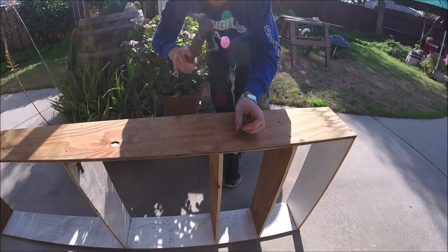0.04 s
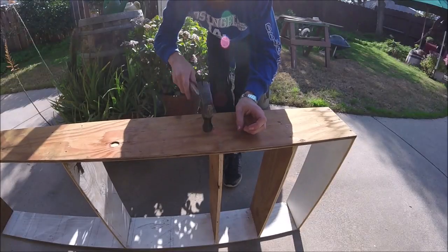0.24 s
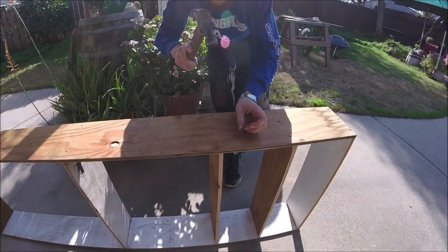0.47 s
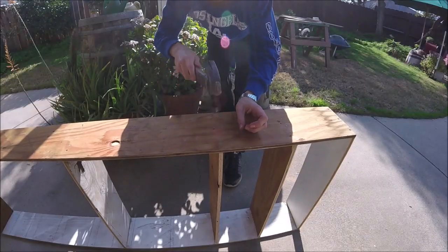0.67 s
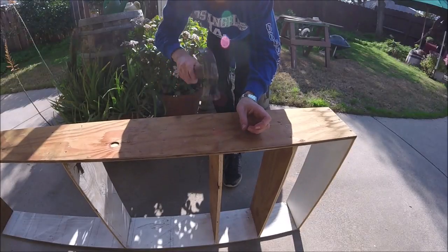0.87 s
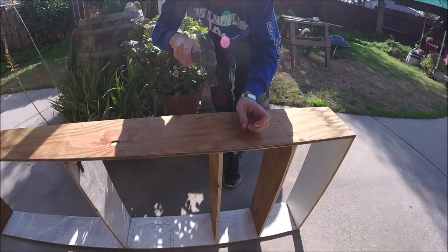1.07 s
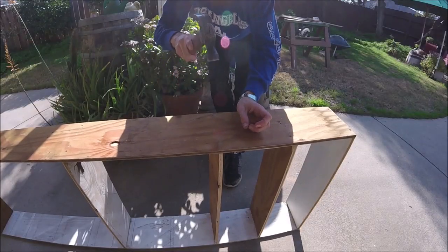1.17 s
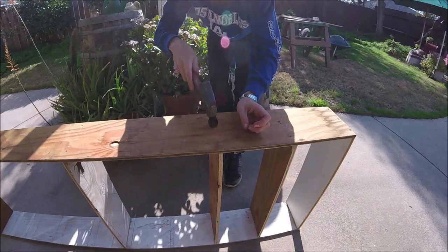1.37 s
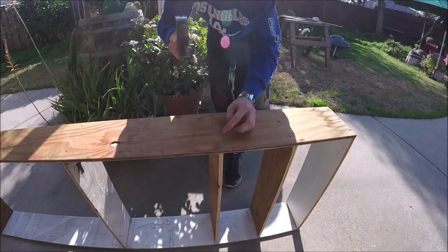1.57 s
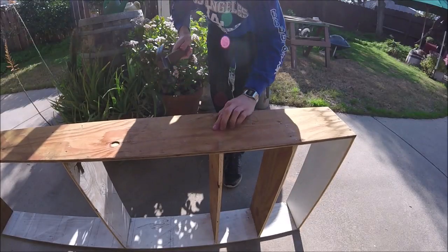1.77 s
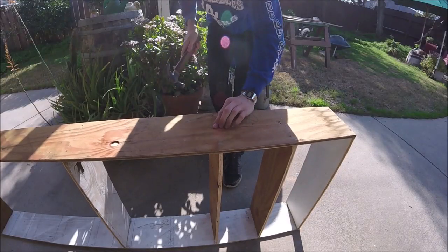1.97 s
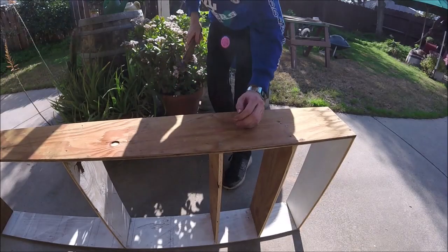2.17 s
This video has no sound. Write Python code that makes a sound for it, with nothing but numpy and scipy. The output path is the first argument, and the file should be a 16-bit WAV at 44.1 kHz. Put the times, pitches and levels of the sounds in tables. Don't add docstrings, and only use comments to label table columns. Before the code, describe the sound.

Close, loud hammering on a hollow wooden frame outdoors: evenly spaced woody cracks with short boom and rattle, early ones bright, the last duller, then only faint wind and distant town rumble remain.

```python
import sys
import numpy as np
from scipy import signal
from scipy.io import wavfile
from scipy.ndimage import uniform_filter1d

SR = 44100
rng = np.random.default_rng(int(sys.argv[2]) if len(sys.argv) > 2 else 0)


def invert_db(level):
    return 10 ** (np.asarray(level, dtype=float) / 20)


def int16_out(signal):
    q = np.round(np.clip(np.atleast_2d(signal).T, -1, 1) * 32767)
    wavfile.write(sys.argv[1], SR, q.astype(np.int16))


N = 98519


def curve(table, hz):
    table = np.array(table)
    return np.interp(np.log(hz), np.log(table[:, 0]), table[:, 1])


def unit(x):
    return x / np.sqrt(np.mean(x ** 2))


def band(hz, width, size):
    edges_hz = [hz / width, min(hz * width, SR * .49)]
    sos = signal.butter(2, edges_hz, "bandpass", fs=SR, output="sos")
    return unit(signal.sosfilt(sos, rng.standard_normal(size + 4096))[4096:])


def fade(t, t60_s):
    return np.exp(-np.log(1000) * t / t60_s)


def swell(t, start_s, rise_s, t60_s):
    t = np.maximum(t - start_s, 0)
    return (1 - np.exp(-t / rise_s)) * fade(t, t60_s)


def walk(rate_hz):
    hold = int(SR / rate_hz)
    steps = np.repeat(rng.standard_normal(N // hold + 1), hold)
    return 1.23 * uniform_filter1d(uniform_filter1d(steps, hold), hold)[:N]


def ping(t, hz, t60_s):
    t = np.maximum(t, 0)
    return fade(t, t60_s) * np.sin(2 * np.pi * hz * t)


def ring(t, modes):
    scatter_db, jitter = 1, .003
    out = 0
    for hz, db, t60_s in modes:
        c = rng.standard_normal(2)
        out = out + invert_db(db + scatter_db * c[0]) * ping(t, hz * (1 + jitter * c[1]), t60_s)
    return out


def hammering():
    # (time [s], level [dB], long-board boom [dB], shelf [dB], steel [dB])
    blows = [
        (-.045, -12.5, -14, 0, 0),
        (0.3086, -7, -8, 1, 3),
        (.6762, -7.5, -5, 1.5, 0),
        (1.0230, -6.5, -8.5, 3, -3.5),
        (1.4153, -6, -14.5, 1.5, -9),
    ]
    # (boom t60 [s], 500 Hz panel [dB], 620 Hz panel [dB], first knock [dB],
    # treble tail [dB])
    seatings = [
        (1, -0.5, -7.5, 2.5, 5.5),
        (0.62, -2, -12.5, 3, 2.5),
        (0.43, 2.5, -5.5, -2.5, 2.5),
        (0.48, 0.5, 1, -6.5, -1),
        (0.31, 1.5, 0, -7, -6.5),
    ]
    lead = SR // 10
    out = np.zeros(N + lead + SR)
    for (time_s, db, *colour), seating in zip(blows, seatings):
        sunk_s = max(time_s - .6, 0)
        x = blow(sunk_s, *colour, *seating)
        i = int(time_s * SR) + lead
        out[i:i + len(x)] += invert_db(db) * x
    return out[lead:lead + N]


def blow(sunk_s, boom_db, shelf_db, steel_db, boom_t60_s, low_db, high_db, knock_db, tail_db):
    # (delay [s], level [dB])
    echoes = [
        (.0085, -10),
        (.026, -9),
        (.041, -16),
    ]
    steel_echo_db, bass_cut_hz = -7, 104
    t = np.arange(SR // 2) / SR
    wood = boards(t, boom_db, shelf_db, boom_t60_s, low_db, high_db) + nail_knock(t, sunk_s, knock_db)
    steel = invert_db(steel_db) * hammer_head(t)
    out = wood + steel
    for delay_s, db in echoes:
        out = out + invert_db(db) * np.interp(t - delay_s, t, wood + invert_db(steel_echo_db) * steel, left=0)
    out = out + rattle(t, boom_db, shelf_db, boom_t60_s, tail_db)
    return signal.sosfilt(signal.butter(2, bass_cut_hz, "highpass", fs=SR, output="sos"), out)


def boards(t, boom_db, shelf_db, boom_t60_s, low_db, high_db):
    # (frequency [Hz], level [dB], t60 [s])
    board_modes = [(157.8, 1.5, 0.58), (214, -27.5, .35), (265.3, -18, 0.33), (417, -17.5, 0.36),
                   (487.8, -14.5, 0.34), (498.3, 1, 0.22), (540, -6.5, 0.2), (622.7, 2.5, .22),
                   (683.6, -11.5, 0.29), (769, -8.5, .19), (97.2, -19.5, 0.81), (130, -25.5, .4),
                   (199.8, -15, .3)]
    # (frequency [Hz], level [dB], t60 [s])
    shelf_modes = [(842, -13, .25), (918, -11, .17), (945, -16, .2), (1008, -8, .16), (1053, -16, .3),
                   (1087, -9, .15), (1126, -9, .18), (1167, -10, .2), (1211, -14, .16), (1254, -14, .2),
                   (1376, -19, .22), (1480, -19, .09)]
    boards_db, shelves_db, rise_s = -7, 1, .006
    thud_hz, thud_db, thud_t60_s = 174.9, -4.5, .093
    modes = np.array(board_modes, float)
    modes[0, 1] += boom_db
    modes[0, 2] = boom_t60_s
    modes[10:12, 2] *= boom_t60_s / .6
    modes[4:6, 1] += low_db
    modes[7, 1] += high_db
    wood = ring(t, modes) + invert_db(shelves_db + shelf_db) * ring(t, shelf_modes)
    wood = invert_db(boards_db) * wood * (1 - np.exp(-t / rise_s))
    return wood + invert_db(thud_db) * ping(t, thud_hz, thud_t60_s)


def nail_knock(t, sunk_s, knock_db):
    hz, level_db, t60_s = 1143, .5, .013
    seat_s, seat_db = .003083 + .00091 * sunk_s, 3.5
    knock_hz = hz * (1 - .65 * sunk_s)
    seat_hz = hz * .9 * (1 - .31 * sunk_s)
    first = invert_db(knock_db) * ping(t, knock_hz, t60_s)
    slap = invert_db(seat_db) * ping(t - seat_s, seat_hz, t60_s)
    return invert_db(level_db) * (first - slap)


def hammer_head(t):
    # (frequency [Hz], level [dB], t60 [s])
    steel_modes = [(2146, -5.5, .05), (2574, -3.5, 0.037), (3342, 1, 0.034), (3586, -0.5, 0.026),
                   (5250, -9.5, 0.039), (5700, -5, .02), (6756, -21.5, 0.093), (2620, -18.5, 0.23),
                   (3390, -20.5, 0.2), (3550, -17, 0.32), (1480, -16, 0.027), (4400, -16, 0.012)]
    steel_db, crack_db, crack_s, contact_s = -13.5, -12.5, .0015, .00015
    rebound_s, rebound_db, rebound_t60_s, rebound_rise_s = .0058, -8, .011, .002
    steel = invert_db(steel_db) * ring(t, steel_modes)
    steel = steel + invert_db(crack_db) * np.exp(-t / crack_s) * band(2800., 2.4, len(t))
    late = np.maximum(t - rebound_s, 0)
    chirp_hz = 6300 + 90000 * late
    chirp = (1 - np.exp(-late / rebound_rise_s)) * ping(late, chirp_hz, rebound_t60_s)
    return (steel + invert_db(rebound_db) * chirp) * (1 - np.exp(-t / contact_s))


def rattle(t, boom_db, shelf_db, boom_t60_s, tail_db):
    # (frequency [Hz], density [dB per Hz])
    wood_density = [(35, -49), (60, -23.5), (163, -4.5), (332, -17.5), (617, -3), (1100, -10), (1500, -30),
                    (1950, -57), (3300, -120)]
    # (frequency [Hz], density [dB per Hz])
    hiss_density = [(880, -35), (1500, -8.5), (2640, -3), (2830, -11), (3590, -7.5), (6890, -9.5),
                    (13000, -25), (15100, -46.5), (16000, -74)]
    # (frequency [Hz], t60 [s])
    decay = [(80, 0.67), (300, 0.3), (700, 0.17), (1300, 0.19), (3000, 0.19), (6000, 0.22), (10000, 0.092),
             (15000, 0.19)]
    wood_db, hiss_db, rise_s = -13, -35.5, .0047
    wall_s, wall_db = .016, -6
    yard_s, yard_db, yard_rise_s = .085, -14.5, .0067
    late_db, late_stretch = -23.5, 3.53
    dull_hz, dull_per_db = 6000, 1.36
    out = 0
    for hz in 70 * 2 ** np.arange(0, 7.8, 1 / 4):
        t60_s = curve(decay, hz)
        if hz < 200:
            t60_s *= boom_t60_s / .6
            colour_db = boom_db
        elif hz < 800:
            colour_db = 0
        else:
            colour_db = shelf_db if hz < 1600 else tail_db
        near = swell(t, 0, rise_s, t60_s) + invert_db(wall_db) * swell(t, wall_s, rise_s, t60_s)
        yard = invert_db(yard_db) * fade(yard_s, t60_s) * swell(t, yard_s, yard_rise_s, t60_s)
        late = invert_db(late_db) * swell(t, 0, yard_rise_s, t60_s * late_stretch)
        db = wood_db + curve(wood_density, hz) if hz < 1500 else hiss_db + curve(hiss_density, hz)
        db += 10 * np.log10(hz / 500) + colour_db
        db += dull_per_db * tail_db * max(np.log2(hz / dull_hz), 0)
        out = out + invert_db(db) * (near + yard + late) * band(hz, 2 ** (1 / 8), len(t))
    return out


def outdoors():
    # (frequency [Hz], density [dB per Hz])
    town_density = [(110, -47.5), (180, -11), (252, -2.5), (272, -10), (452, -13.5), (871, -6),
                    (1240, -22.5), (9820, -43), (16000, -57)]
    # (frequency [Hz], density [dB per Hz])
    wind_density = [(8.8, -31), (15, -2.5), (38, -3), (70, -21), (151, -13), (178, -28.5), (200, -35),
                    (260, -65), (440, -120)]
    # (time [s], level [dB])
    gain_curve = [(0, 9), (.3, 3), (.65, 2), (1.0, 2.5), (1.35, -4), (1.75, -4), (2.05, 2), (2.23, 6.5)]
    # (time [s], level [dB])
    hum_curve = [(0, -40.5), (0.201, -51), (.6, -48.5), (0.899, -49.5), (1.3, -54.5), (1.65, -51),
                 (1.85, -63), (2.23, -56.5)]
    town_db, wind_db, gust_db, flicker_db, hum_hz = -88, -71, 2, 1.5, 68
    t = np.arange(N) / SR
    gust = gust_db * walk(9)
    out = 0
    for hz in 20 * 2 ** np.arange(0, 9.6, 1 / 3):
        if hz < 190:
            db = wind_db + curve(wind_density, hz) + gust
        else:
            db = town_db + curve(town_density, hz)
        db = db + 10 * np.log10(hz) + flicker_db * walk(8)
        out = out + invert_db(db) * band(hz, 2 ** (1 / 6), N)
    gain_db = np.interp(t, *np.transpose(gain_curve))
    hum_db = np.interp(t, *np.transpose(hum_curve))
    return out * invert_db(gain_db) + invert_db(hum_db) * band(hum_hz, 1.15, N)


def scene():
    return (hammering() + outdoors())[None]


def low_pass(x):
    return signal.sosfilt(signal.butter(12, 16460, fs=SR, output="sos"), x)


def record(dry):
    rounded = np.tanh(0.42 * dry) / 0.38
    top_cut = signal.ellip(8, .2, 70, 15900, fs=SR, output="sos")
    return low_pass(signal.sosfilt(top_cut, rounded))


dry = scene()
out = record(dry)
int16_out(out)
```